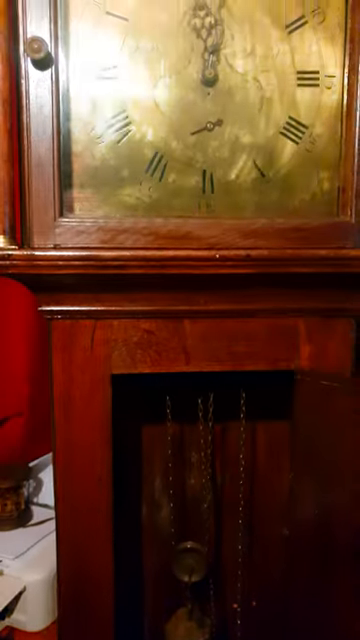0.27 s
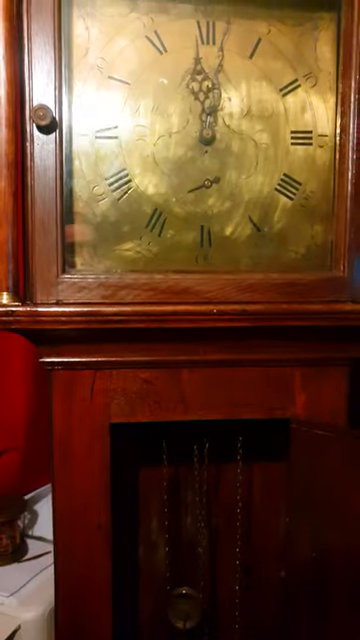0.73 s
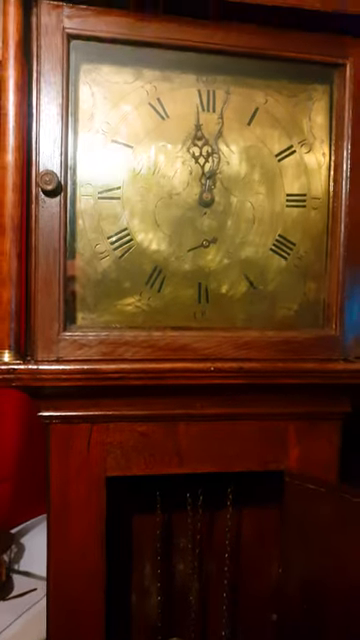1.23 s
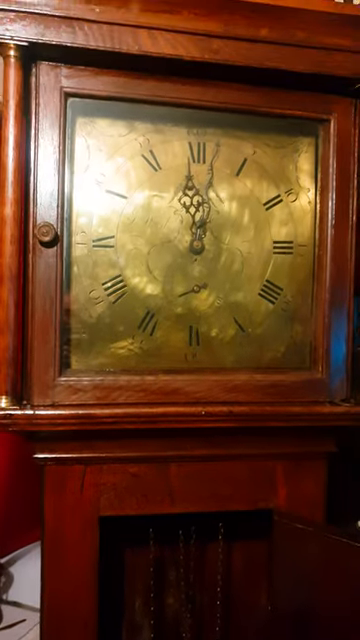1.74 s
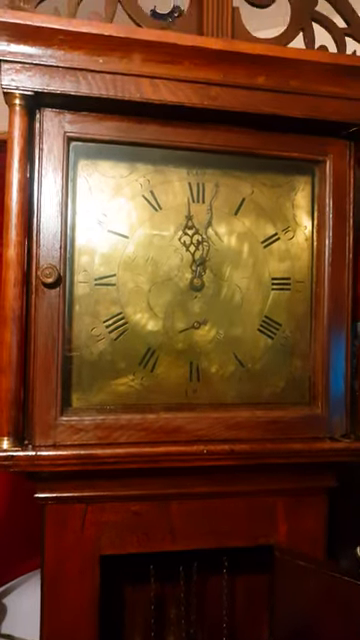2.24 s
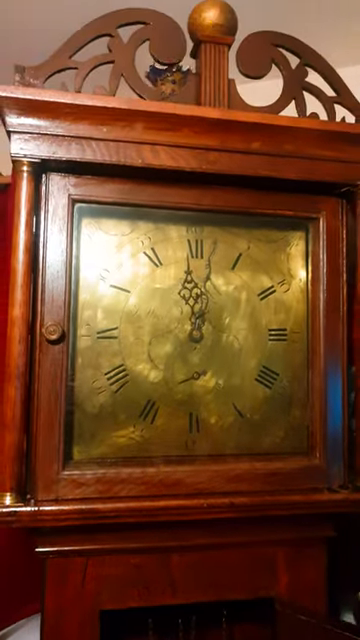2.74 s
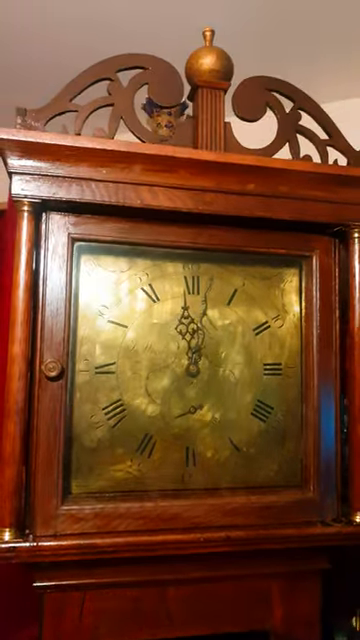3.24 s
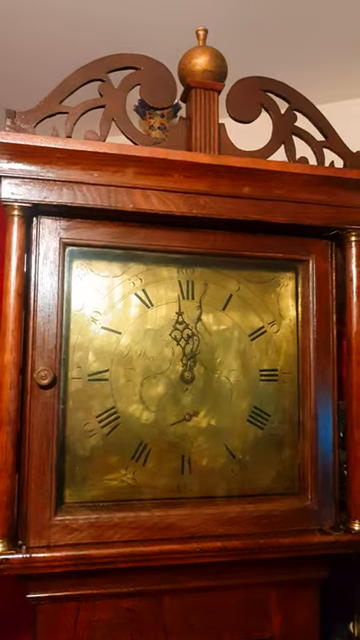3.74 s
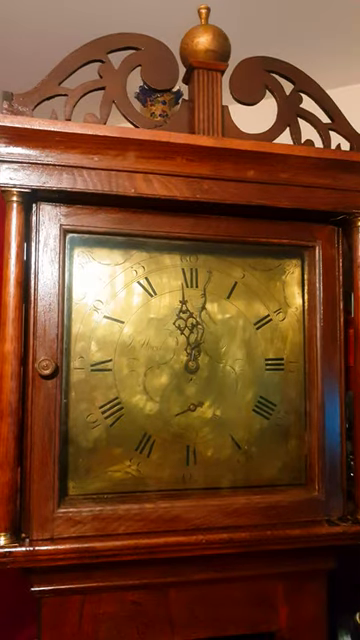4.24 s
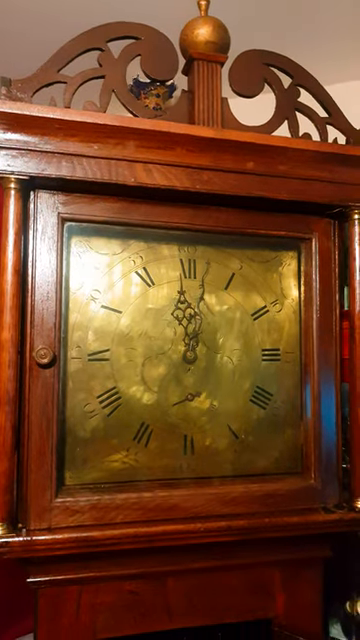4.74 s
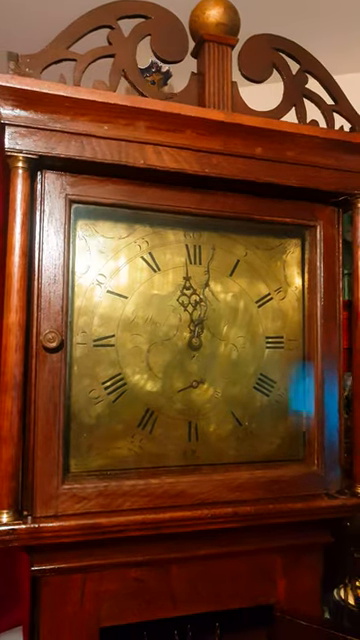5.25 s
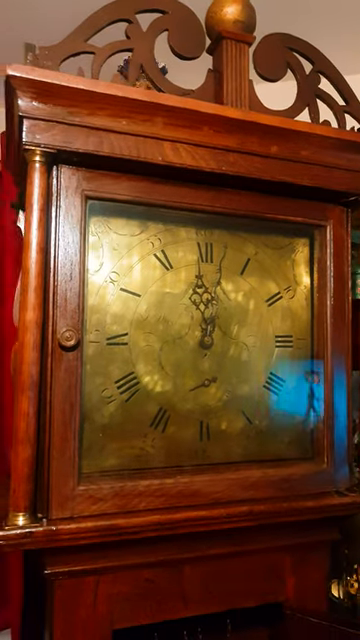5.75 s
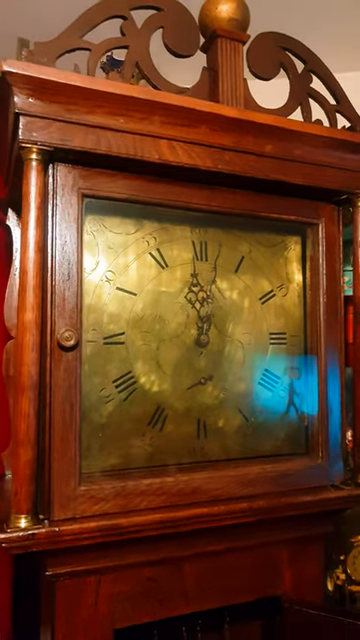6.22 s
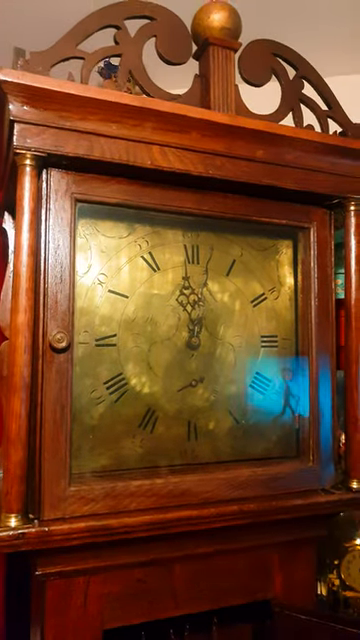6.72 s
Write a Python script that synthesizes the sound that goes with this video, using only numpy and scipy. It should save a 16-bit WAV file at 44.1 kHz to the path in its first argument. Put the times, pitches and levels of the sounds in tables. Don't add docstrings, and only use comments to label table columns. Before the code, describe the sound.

A longcase clock strikes a bright, clangy bell about once a second in a furnished room, with blunt finger knocks on the microphone among the blows.

```python
import sys
import numpy as np
from scipy import signal
from scipy.fft import rfft, irfft, next_fast_len
from scipy.io import wavfile
from scipy.ndimage import uniform_filter1d, map_coordinates

SR = 44100
rng = np.random.default_rng(int(sys.argv[2]) if len(sys.argv) > 2 else 0)


def voltage_ratio(level):
    return 10 ** (np.asarray(level, float) / 20)


def generate_wav(sig):
    pcm = np.round(np.clip(np.atleast_2d(sig).T, -1, 1) * 32767).astype(np.int16)
    wavfile.write(sys.argv[1], SR, pcm)


N = 307814

# (time [s], shimmer level [dB], upper shimmer relative level [dB],
# top shimmer relative level [dB], left over right [dB])
HAMMER_BLOWS = [
    (0.4268, -14.5, -3.5, -2.5, 0),
    (1.3792, -11.5, -8.5, -3, 3.5),
    (2.3507, -15.5, -3.5, -2, 0),
    (3.325, -15.5, -4.5, -0.5, 1.5),
    (4.2538, -25, -3, -3, 6.5),
    (5.2043, -22, -5, -1.5, 5),
    (6.1417, -14.5, -7, -3, 5.5),
]
# (frequency [Hz], twin frequency [Hz], t60 [s], lead of the left microphone [cycles])
TWIN_MODES = [
    (1468.8, 1479.4, 6.2, -.33),
    (2627.3, 2626.7, 4, .45),
    (4014.5, 4029, 1.7, .1),
    (5633.9, 5638, .8, .2),
    (7450.4, 7466.6, .5, .1),
]
# (left level [dB], right level [dB], twin relative level [dB], left, right start of beat [cycles])
TIERCE_STRENGTHS = [(-37.5, -46.5, -12.5, 0.28, 0.26), (-33.5, -35.5, -14, 0.071, 0.088),
                    (-34.5, -46, -9, 0.39, 0.34), (-32, -37, -14.5, -0.53, -0.05),
                    (-36, -36, -15.5, -0.59, 0.027), (-34.5, -36, -20, -0.49, -0.015),
                    (-39, -37, -12, 0.42, 0.011), (-38.5, -42, -14, 0.43, -0.00086)]
# (left level [dB], right level [dB], twin relative level [dB], left, right start of beat [cycles])
NOMINAL_STRENGTHS = [(-47, -49, 9, -0.475, 0.414), (-26.5, -34.5, -18, -0.39, -0.21),
                     (-33.5, -31, 0, -0.073, 0.11), (-35.5, -28.5, -0.5, 0.4, -0.36),
                     (-41, -28.5, 3.5, 0.15, -0.00022), (-45.5, -43.5, 10, 0.42, 0.19),
                     (-33, -33.5, -2.5, -0.22, 0.39), (-38.5, -39.5, 8.5, -0.19, 0.43)]
# (left level [dB], right level [dB], twin relative level [dB], left, right start of beat [cycles])
TWELFTH_STRENGTHS = [(-54.5, -66.5, 17, 0.016, 0.36), (-26, -23, -20, 0.41, -0.39),
                     (-28.5, -26.5, -0.5, 0.18, -0.07), (-38.5, -46, 16, -0.34, -0.06),
                     (-15.5, -19, -3, -0.31, -0.05), (-30.5, -33.5, 9, -0.23, -0.24),
                     (-27.5, -24.5, -7.5, -0.35, -0.23), (-24.5, -27, 5, -0.12, -0.3)]
# (left level [dB], right level [dB], twin relative level [dB], left, right start of beat [cycles])
OCTAVE_STRENGTHS = [(-76, -67, 14, 0.43, 0.017), (-20.5, -30, -2, 0.089, -0.23),
                    (-46, -42.5, 11.5, -0.27, -0.38), (-24.5, -10.5, -5.5, -0.41, -0.33),
                    (-29.5, -22, 0, -0.32, -0.08), (-17.5, -29.5, -10, 0.093, 0.25),
                    (-18.5, -20, -5, 0.24, 0.22), (-20.5, -6, -10.5, 0.25, 0.056)]
# (left level [dB], right level [dB], twin relative level [dB], left, right start of beat [cycles])
TOP_STRENGTHS = [(-74, -78, -5, -0.31, 0.29), (-21, -27, -3, -0.047, -0.46),
                 (-26.5, -25, 7.5, 0.087, -0.53), (-36, -31.5, 7, 0.094, 0.48),
                 (-19, -24.5, -2.5, 0.48, 0.25), (-42.5, -67, 16, 0.14, -0.19), (-27, -42, 0, 0.53, 0.046),
                 (-24, -23.5, -2.5, -0.12, -0.39)]
# (left level [dB], right level [dB])
HUM_NOTE_STRENGTHS = [(-41, -41.5), (-35, -34.5), (-34, -34.5), (-33.5, -34.5), (-45, -47.5), (-39, -41),
                      (-38, -41.5), (-45, -52)]
# (left [dB/s], right [dB/s], twin relative [dB/s], left lead [cycles/s])
TIERCE_NODE_DRIFT = [(-1, 18, -16, -0.057), (-3, 0, 4, -0.00032), (1, -8, -33, 0.97), (-2.5, 2, 0, -0.028),
                     (-2.5, 0, 6, 0.078), (-2, -1.5, 1, -0.045), (3, 6.5, 3.5, -0.16), (1, 6, -0.5, -0.175)]
# (left [dB/s], right [dB/s], twin relative [dB/s], left lead [cycles/s])
TWELFTH_NODE_DRIFT = [(-36, 21, -14, 0.23), (1, -12, 23, 0.38), (-8.5, -20, -7, 0.029),
                      (25.5, 26.5, -17.5, 0.16), (-12, -10, 10.5, 0.27), (-6.5, -2, -10, 0.14),
                      (7.5, 5.5, 1, 0.17), (-23.5, -3, 6, -0.17)]
# (left [dB/s], right [dB/s], twin relative [dB/s], left lead [cycles/s])
OCTAVE_NODE_DRIFT = [(5, -25, 19, 0.43), (-5, 28, -14, -1), (19, 27, -7, -0.3), (7, -6, -2, -0.033),
                     (21, 12, -14, -0.096), (-20, -4, 8.5, -0.01), (-20, 11.5, -7, 0.95),
                     (-7, -3.5, 5, 0.26)]


def ringing():
    rows_count = len(HAMMER_BLOWS) + 1
    chance = spin(rng.random((6, rows_count, 1)))
    still = np.zeros((rows_count, 4))
    hum = voltage_ratio(np.array(HUM_NOTE_STRENGTHS)) * spin([.09, 0]) * chance[0]
    out = struck(604.6, 12, hum, still[:, :2], still[:, :2])
    blows = [TIERCE_STRENGTHS, NOMINAL_STRENGTHS, TWELFTH_STRENGTHS, OCTAVE_STRENGTHS, TOP_STRENGTHS]
    drifts = [TIERCE_NODE_DRIFT, still, TWELFTH_NODE_DRIFT, OCTAVE_NODE_DRIFT, still]
    for (hz, twin_hz, t60, lead), rows, drift, turn in zip(TWIN_MODES, blows, drifts, chance[1:]):
        rows, drift = np.array(rows), np.array(drift)
        main = voltage_ratio(rows[:, :2]) * spin([lead, 0]) * turn
        twin = main * voltage_ratio(rows[:, 2:3]) * spin(rows[:, 3:])
        slip_hz = drift[:, 3:] * [1, 0]
        drift_db = drift[:, :2]
        out = out + struck(hz, t60, main, drift_db, slip_hz)
        out = out + struck(twin_hz, t60, twin, drift_db + drift[:, 2:3], slip_hz)
    return out


def struck(hz, t60, strengths, drifts_db, slips_hz):
    out = np.zeros((2, N))
    starts = [0] + [round(blow[0] * SR) for blow in HAMMER_BLOWS] + [N]
    rise = 0.01 + .0004 * hz / 1000
    ragged, ragged_s, ragged_hz = 0.56, 0.059, 40.7
    for start, end, strength, drift_db, slip_hz in zip(starts, starts[1:], strengths, drifts_db, slips_hz):
        t = np.arange(min(end + SR // 20, N) - start) / SR
        flutter, turn = rng.uniform(-1.01, 1, (2, 2, 1))
        echoes = np.sin(2 * np.pi * (ragged_hz * flutter * t + turn))
        uneven = 1 + ragged * np.exp(-t / ragged_s) * echoes
        swell = (1 - np.exp(-t / rise)) * uneven if start else 1
        handover = np.exp(-np.maximum(t - (end - start) / SR, 0) / rise)
        fade = voltage_ratio((drift_db[:, None] - 60 / t60) * t) * swell * handover
        size, phase = abs(strength[:, None]), np.angle(strength[:, None])
        wave = np.sin(2 * np.pi * (hz + slip_hz[:, None]) * t + phase)
        out[:, start:start + len(t)] += fade * size * wave
    return out


def spin(cycles):
    return np.exp(2j * np.pi * np.asarray(cycles))


# (level [dB], t60 [s])
SHIMMER_DECAYS = [(-20, 0.23), (-15.5, 0.2), (-36.5, 0.4), (3, 0.039), (-6, 0.24), (-13.5, 0.29),
                  (-14.5, 0.33), (-5, 0.12), (-11, .16), (-4.5, .22), (-15.5, .18), (-3.5, 0.37),
                  (-20.5, 0.27), (-5, 0.17), (-11.5, .16), (-9.5, 0.31), (-1.5, 0.19), (-18.5, 0.14),
                  (-11, 0.24), (-7, 0.24)]
SHIMMER_FREQUENCIES = [6998, 8317, 8436, 9508, 9632, 9694, 9921, 10650, 10840, 11249, 11380, 11731, 12590,
                       12798, 13238, 13990, 14142, 14200, 15360, 15627]
# (frequency [Hz], level [dB])
CLANK_SPECTRUM = [(300, -45), (1300, -16), (2200, -8), (3500, 0), (6000, 12.5), (8800, -1.5), (11000, 12),
                  (15500, 12.5), (17000, -28)]


def hammer():
    out = np.zeros((2, N + SR))
    t = np.arange(int(.55 * SR)) / SR
    hz = np.array(SHIMMER_FREQUENCIES)[:, None]
    level, t60 = np.transpose(SHIMMER_DECAYS)[:, :, None]
    lean_db = 2.15 * (hz > 11000) * np.array([1, -1])[:, None, None]
    for s, db, upper_db, top_db, pan_db in HAMMER_BLOWS:
        clack_db = -24.5 - 0.27 * db
        group_db = np.where(hz < 10300, 0, np.where(hz < 13100, upper_db, top_db))
        chance = rng.standard_normal((2, 2, len(hz), 1))
        decay = voltage_ratio(level + group_db + lean_db + 0.75 * chance[0] - 60 * t / t60)
        partials = decay * np.sin(2 * np.pi * (hz * t + chance[1]))
        flare = partials.sum(1) * (1 - np.exp(-t / 0.0053))
        clank = coloured(rng.standard_normal(len(t)),
                         lambda f: voltage_ratio(along(CLANK_SPECTRUM, f) + (clack_db + 31.0) * (f < 3000)))
        flare = flare + voltage_ratio(-2.5 - 60 * t / 0.036) * (1 - np.exp(-t / 0.0064)) * clank
        wet = signal.fftconvolve(flare, room_tail(SR // 4), axes=1)[:, :len(t)]
        pan = voltage_ratio(db + np.array([[pan_db], [-pan_db]]) / 2)
        out[:, round(s * SR):][:, :len(t)] += pan * (voltage_ratio(-1.0) * flare + voltage_ratio(2.5) * wet)
    return out[:, :N]


# (frequency [Hz], t60 [s])
ROOM_DECAY = [(300, .3), (2000, 0.21), (6000, .17), (15000, 0.16)]


def room_tail(n):
    hz, t, z = signal.stft(rng.standard_normal((2, n)), SR, nperseg=256)
    decay = voltage_ratio(-60 * t / along(ROOM_DECAY, hz)[:, None])
    tail = signal.istft(z * decay, SR, nperseg=256)[1][:, :n]
    return tail / np.linalg.norm(tail[0])


# (time [s], thud level [dB], boom relative level [dB], snap level [dB])
PORT_KNOCKS = [(0.9308, -31, 6, -60), (.974, -29, 3.5, -60), (2.8293, -22, -4, -58), (2.856, -24, -2, -36),
               (2.883, -32, 3, -62), (2.9241, -29, -3, -66), (3.287, -21, -3, -52), (3.317, -32, -2, -77),
               (3.69, -0.5, -22, -1), (3.7324, 0, -21.5, 6.5), (4.0393, -2.5, -11, 3.5),
               (4.3532, 3.5, -15.5, 4), (4.7301, 5, -19.5, -7), (5.28, -35, -4, -72), (5.56, -44, 9, -82),
               (5.7867, -14.5, -3, -29), (5.902, -39, 5, -79), (5.958, -34, 0, -74), (6.428, -22, -1, -18)]


def finger():
    out = np.zeros(N + SR)
    t = np.arange(SR // 20) / SR
    for s, db, boom_db, snap_db in PORT_KNOCKS:
        hz = 472 + 6 * db
        snap_hz = max(2620 + 67 * snap_db, 1390)
        start = int((s - .002) * SR)
        u = t - (s - start / SR)
        after = np.maximum(u, 0)
        thud = np.sin(2 * np.pi * hz * after) * np.exp(-(1.1 * hz * after) ** 1.6)
        thud = thud * 1.15 * (1 - np.exp(-after / 0.00024))
        boom = np.sin(2 * np.pi * 165 * after) * np.exp(-after / 0.0049)
        swing = snap_hz * u
        snap = 2.15 * np.sin(2 * np.pi * 0.18 * swing - .3) * np.exp(-(3.92 * swing) ** 2)
        rebound = 0.92 * np.sin(2 * np.pi * 4300 * after) * np.exp(-after / 0.000096)
        snap = snap + rebound
        grit = uniform_filter1d(rng.standard_normal(len(t)), size=4)
        rattle = voltage_ratio(-28.5) * grit * (u > 0) * np.exp(-after / 0.0042)
        knock = voltage_ratio(db - 6.5) * (thud + voltage_ratio(boom_db) * boom)
        out[start:][:len(t)] += knock + voltage_ratio(snap_db) * (snap + rattle)
    covered_port = signal.butter(2, [70, 7500], "band", fs=SR, output="sos")
    out = signal.sosfilt(covered_port, out)
    return out[:N] * voltage_ratio(np.array([[-30], [0]]))


# (time [s], level [dB])
PICKUP_LEVEL = [(0, 0), (.3, -1), (1.28, .5), (1.5, 3.5), (1.72, -2), (3.2, -1.5), (3.54, 3.5),
                (3.76, -1.5), (4.22, -1.5), (4.45, -5), (5.0, -6.5), (5.95, -3.5), (6.25, 2), (6.5, -2.5),
                (6.98, -5)]
# (frequency [Hz], level [dB])
HISS_SPECTRUM = [(4500, -22), (5900, 1.5), (7000, -9), (8000, -14.5), (9000, -7.5), (10500, 0),
                 (12500, -5.5), (14200, 1), (15750, -6.5), (15900, -79.5)]
# (frequency [Hz], level [dB])
WHIRR_SPECTRUM = [(500, -21), (680, -30.5), (800, -9), (1050, -8), (1380, 2.5), (1620, -8.5), (1800, -5),
                  (2400, -7), (2850, -13), (3600, -20.5), (4300, -9.5), (5200, -22.5), (6500, -40.5)]
# (frequency [Hz], level [dB])
RUMBLE_SPECTRUM = [(20, -34), (40, -23), (100, -11.5), (170, -13.5), (200, -8.5), (400, -9.5), (560, -6),
                   (700, -14), (900, -51.5)]
# (frequency [Hz], width [Hz], level [dB])
STANDING_WAVES = [(218.3, 10.1, 10.5), (281.5, 9.8, 15), (368.5, 19, 8), (433, 49, -4), (503, 10, -6.5)]
# (time [s], level [dB])
FAR_HUM_LEVEL = [(0, -75), (.4, -66), (.75, -56.5), (1.75, -58.5), (2.9, -65.5), (3.67, -55), (4.28, -65),
                 (4.67, -58.5), (5.35, -64.5), (6.3, -58.5), (6.55, -66), (6.98, -65)]


def background():
    pickup_db, = curves(PICKUP_LEVEL)
    flutter = wobble(3.1)

    def modes(f):
        return 1 + sum(voltage_ratio(db) * w ** 2 / (w ** 2 + 4 * (f - c) ** 2) for c, w, db in STANDING_WAVES)

    hiss = rush(lambda f: voltage_ratio(along(HISS_SPECTRUM, f)), 0.18, patchy_db=3.5)
    hiss = voltage_ratio(-53 + 1.32 * pickup_db + 1.2 * flutter) * hiss
    whirr = rush(lambda f: voltage_ratio(along(WHIRR_SPECTRUM, f)), 0.034, patchy_db=3.0)
    whirr = voltage_ratio(-54 + 0.85 * pickup_db + 0.14 * flutter) * whirr
    rumble = rush(lambda f: voltage_ratio(along(RUMBLE_SPECTRUM, f)) * modes(f), 0.82, patchy_db=1.67)
    rumble = voltage_ratio(-51.5 + 0.77 * pickup_db + 0.69 * wobble(5)) * rumble
    cycles = np.cumsum(71.3 + 0.9 * wobble(3.4)) / SR
    hum_db = curves(FAR_HUM_LEVEL)[0] + 0.93 * wobble(5.6) + np.array([[1.5], [-1.5]])
    hum = voltage_ratio(hum_db) * np.sin(2 * np.pi * cycles)
    return hiss + whirr + rumble + hum


def rush(gain, alike, patchy_db):
    z = signal.stft(rng.standard_normal((2, N)), nperseg=512)[2]
    field = uniform_filter1d(rng.standard_normal(z.shape[1:]), size=40, axis=0)
    field = uniform_filter1d(field, size=6, axis=1)
    patchy = signal.istft(z * voltage_ratio(patchy_db * unit(field)), nperseg=512)[1][:, :N]
    a, b = coloured(patchy, gain)
    turn = np.arccos(np.clip(alike, -1, 1)) / 2
    mid, side = np.cos(turn) * a, np.sin(turn) * b
    return unit(np.array([mid + side, mid - side]))


def coloured(x, gain):
    m = next_fast_len(x.shape[-1] + 8192)
    return irfft(rfft(x, m) * gain(np.fft.rfftfreq(m, 1 / SR)), m)[..., :x.shape[-1]]


def along(points, hz):
    f, v = np.transpose(points)
    return np.interp(np.log(hz + 1), np.log(f + 1), v)


def curves(rows):
    s, *cols = np.transpose(rows)
    return [np.interp(np.arange(N) / SR, s, c) for c in cols]


def unit(x):
    return x / np.sqrt(np.mean(x ** 2) + 1e-20)


def wobble(rate):
    knots = rng.standard_normal(int(N * rate / SR) + 4)
    return map_coordinates(knots, [np.arange(N) * rate / SR])


def scene():
    return ringing() + hammer() + finger() + background()


def masked(x, under_db, slope_db, quiet_db, cut_db):
    hz, _, z = signal.stft(x, SR, nperseg=2048)
    level = 20 * np.log10(abs(z) + 1e-9)
    fall = slope_db * np.log2(hz + 50)[:, None]
    shadow = np.maximum.accumulate(level + fall, axis=1) - fall - under_db
    threshold = np.where((hz > 2700) & (hz < 9000), quiet_db, -200)[:, None]
    shadow = np.maximum(shadow, threshold)
    hidden = (uniform_filter1d(level, size=9, axis=1) < shadow) & (level < shadow + 12)
    return signal.istft(z * voltage_ratio(cut_db * hidden), SR, nperseg=2048)[1][:, :N]


def low_pass(x):
    return signal.sosfilt(signal.butter(12, 16830, fs=SR, output="sos"), x)


def record(dry):
    full = np.clip(dry, -.98, .98)
    mix = masked(full, under_db=37.5, slope_db=24.5, quiet_db=-97, cut_db=-30)
    return low_pass(mix)


dry = scene()
out = record(dry)
generate_wav(out)
```